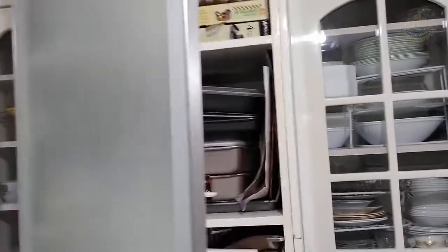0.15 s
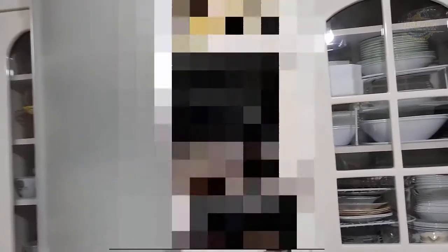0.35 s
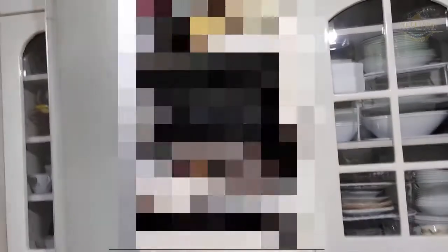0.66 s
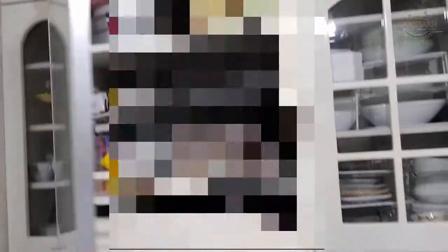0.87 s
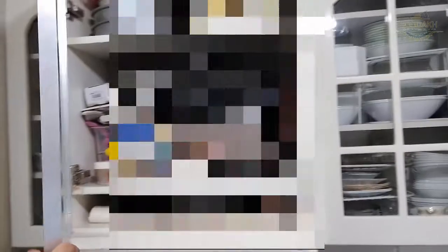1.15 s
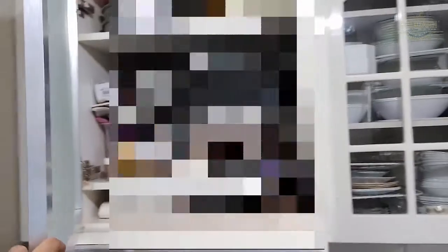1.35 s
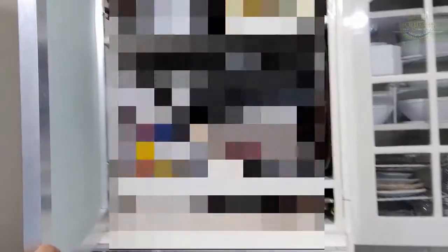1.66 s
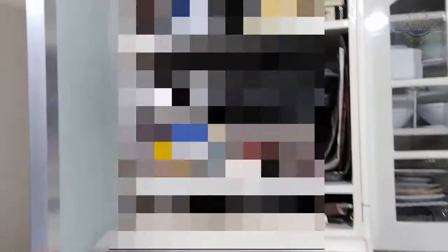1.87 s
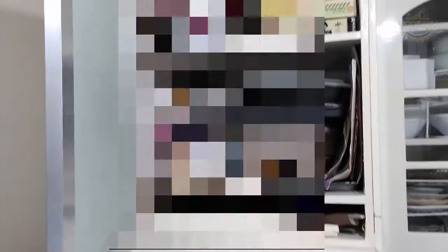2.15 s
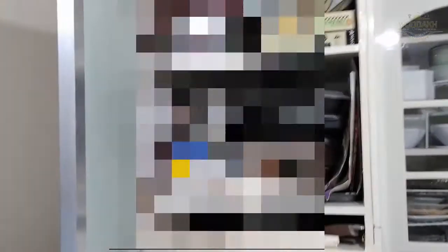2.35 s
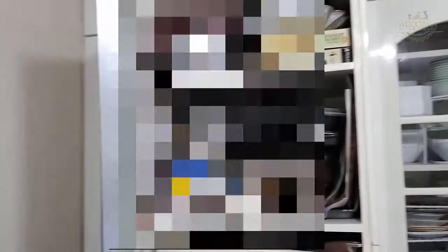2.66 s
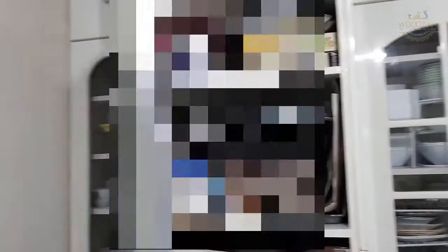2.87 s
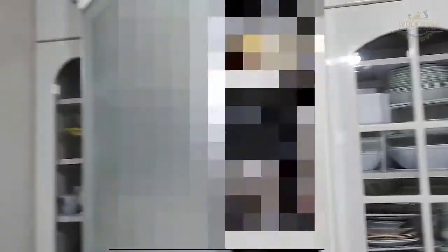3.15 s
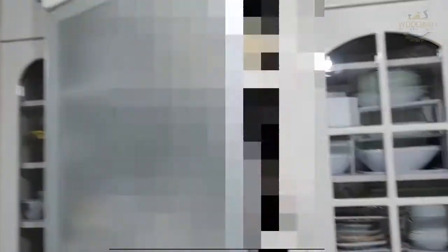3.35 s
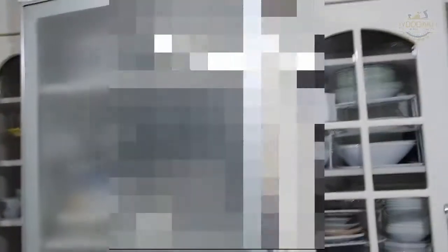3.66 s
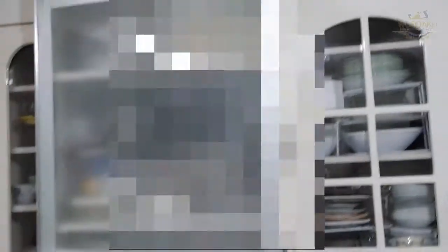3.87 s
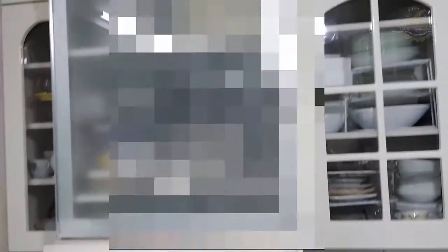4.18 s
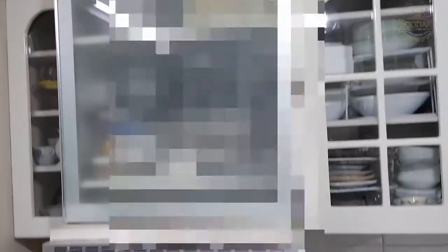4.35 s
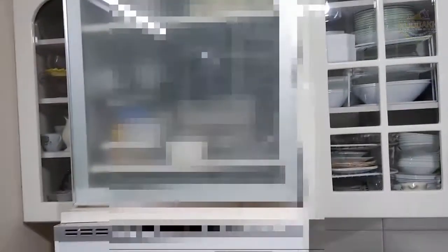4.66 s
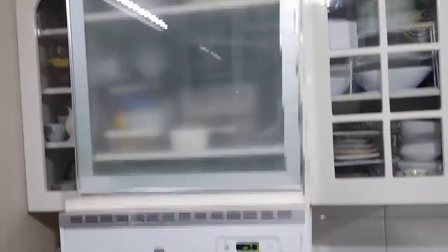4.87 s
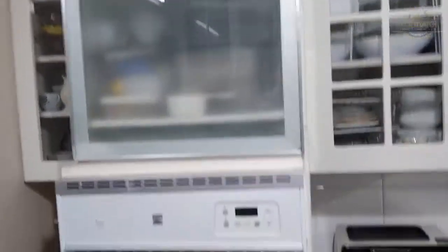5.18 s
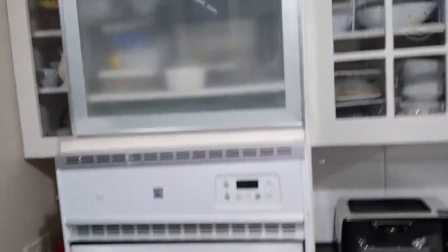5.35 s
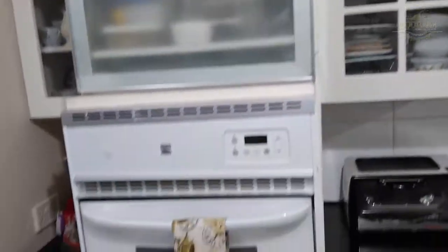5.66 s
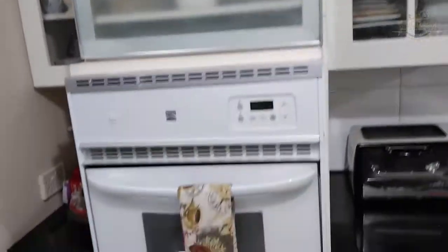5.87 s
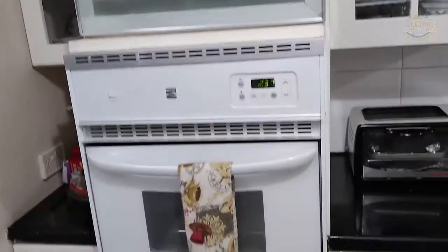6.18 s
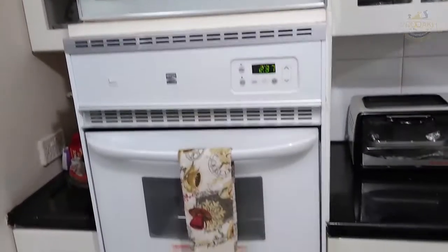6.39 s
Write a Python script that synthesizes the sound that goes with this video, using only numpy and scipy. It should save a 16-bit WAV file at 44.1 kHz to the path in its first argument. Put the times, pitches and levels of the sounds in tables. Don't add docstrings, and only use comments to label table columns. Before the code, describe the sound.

In a quiet kitchen a cabinet door drags with a hollow boom, its catch snaps twice, then slippers scuff and step on tiles over a fridge's hum.

```python
import sys
import numpy as np
from scipy import signal
from scipy.fft import rfft, irfft, next_fast_len
from scipy.io import wavfile
from scipy.ndimage import uniform_filter1d, map_coordinates

SR = 44100
rng = np.random.default_rng(int(sys.argv[2]) if len(sys.argv) > 2 else 0)


def magnitude_from_level(level_db):
    exponent = np.asarray(level_db, float) / 20
    return 10 ** exponent


def store_wav(level_fs):
    pcm = np.round(np.clip(np.atleast_2d(level_fs), -1, 1) * 32767)
    wavfile.write(sys.argv[1], SR, pcm.T.astype(np.int16))


N = 287576
SIZE = next_fast_len(N, True)
HZ = np.fft.rfftfreq(SIZE, 1 / SR) + 1e-3
TIME = np.arange(N) / SR
PORT_LAG_S = 0.000469
# [f/Hz, width/Hz, level/dB]
TILES = [(212, 88, -0.5), (323, 44, -0.5), (430, 65, -9), (633, 140, -0.5), (860, 190, -7), (1110, 79, -2)]


def on_hz(table):
    f, v = np.transpose(table)
    return np.interp(np.log(HZ), np.log(f), v)


def on_time(table):
    s, *columns = np.transpose(table)
    return [np.interp(TIME, s, c) for c in columns]


def colour(x, gain):
    return irfft(rfft(x, SIZE) * gain, SIZE)[..., :N]


def unit(x):
    return x / np.sqrt(np.mean(x ** 2))


def modes(table):
    out = 0
    for k, (f, w, db) in enumerate(table):
        out = out + (-1) ** k * magnitude_from_level(db) * 1j * HZ * w / (f * f - HZ ** 2 + 1j * HZ * w)
    return out


def peaks(table):
    return 1 + sum((magnitude_from_level(db) - 1) / (1 + (2 * (HZ - f) / w) ** 2) for f, w, db in table)


def band(lo_hz, hi_hz, order=3):
    sos = signal.butter(order, [lo_hz, hi_hz], "band", fs=SR, output="sos")
    return signal.sosfreqz(sos, HZ, fs=SR)[1]


def walk(rate_hz):
    k = int(SR / rate_hz)
    steps = np.repeat(rng.standard_normal(N // k + 1), k)
    return 1.295 * uniform_filter1d(uniform_filter1d(steps, k), k)[:N]


def diffuse(pair, most=0.96):
    like = np.clip(most, 0, 1) * np.sinc(2 * HZ * PORT_LAG_S)
    mid, side = rfft(pair, SIZE) * np.sqrt([(1 + like) / 2, (1 - like) / 2])
    return irfft([mid + side, mid - side], SIZE)[:, :N]


def fan_air():
    # [f/Hz, level/dB per Hz]
    air_tone = [(18, -48), (30, 4), (103, -27), (199, -9.5), (384, -6), (437, -3), (540, -15), (1190, -17),
                (2120, -16), (2540, -16.5), (3490, -21.5), (4300, -25.5), (9710, -40.5), (14400, -38.5),
                (16000, -30)]
    # [f/Hz, width/Hz, level/dB]
    air_peaks = [(140.5, 55.4, 13), (355.8, 30, 2), (493, 6.3, 9.5), (827, 3.7, 14.5), (2412, 250, 7.5),
                 (7050, 540, 6), (9640, 1100, 13)]
    shape = magnitude_from_level(on_hz(air_tone)) * peaks(air_peaks) * np.abs(band(90, 17000)) / (1 + (HZ / 15120) ** 300)
    shape /= np.sqrt(2 * np.mean(shape ** 2 * (HZ > 2300) * (HZ < 4000)))
    return colour(diffuse(rng.standard_normal((2, N))), shape)


def mains_buzz():
    mains_hz, tooth_width_hz = 50.007, 0.64
    # [f/Hz, level/dB over air]
    buzz_tone = [(30, -50), (50, -20.5), (150, -4.5), (600, -5), (1300, -4.5), (1900, -5), (2500, -4.5),
                 (3000, -9), (3500, -9.5), (4300, -15.5), (7000, -16), (10000, -20.5), (12000, -25.5),
                 (15000, -51)]
    # [mains multiple, extra level/dB]
    teeth = [(3, 9), (4, 11), (6, 5), (8, 4), (12, 4), (36, 6), (38, 9), (40, 5), (42, 8), (45, 5), (47, 6),
             (49, 7), (51, 7), (55, 7), (63, 6), (68, 9), (70, 10), (72, 9), (112, 7), (119, 7), (127, 9),
             (129, 8), (131, 6), (140, 8), (142, 8), (144, 6), (146, 6), (191, 7), (195, 8)]
    tooth = np.round(HZ / mains_hz).astype(int)
    tooth_db = 2.5 * rng.standard_normal(tooth[-1] + 1)
    for multiple, db in teeth:
        tooth_db[round(multiple)] = db
    comb = np.exp(-((HZ - tooth * mains_hz) / tooth_width_hz) ** 2) * magnitude_from_level(tooth_db[tooth])
    return colour(diffuse(rng.standard_normal((2, N))), comb * magnitude_from_level(on_hz(buzz_tone) + 28.5))


def compressor_drone():
    # [t/s, f/Hz, level/dB over background]
    drone_track = [(0, 440, -4.5), (1.0, 441.5, -1), (1.6, 438, -6), (2.8, 437, -12), (3.7, 435.5, -9),
                   (3.86, 435.5, 0), (4.7, 435.5, 3), (5.5, 434.5, 2.5), (6.0, 434, -.5), (6.52, 434.5, 0)]
    hz, db = on_time(drone_track)
    tone = np.sqrt(2) * np.sin(2 * np.pi * np.cumsum(hz) / SR)
    return magnitude_from_level(db) * tone * magnitude_from_level(.35 * walk(12))


def rumble():
    # [t/s, level/dB over background]
    rumble_track = [(0, -19), (.9, -13), (1.3, -0.5), (1.7, -13.5), (2.45, -16), (3.5, -17), (4.0, -26),
                    (5.0, -13), (5.6, -11), (6.52, -16)]
    low_modes = modes([(50.0, 2.6, 2.5), (75.4, 26, -4.0)]) ** 2
    deep = unit(colour(diffuse(rng.standard_normal((2, N)), most=0.9), low_modes))
    return magnitude_from_level(on_time(rumble_track)[0]) * deep


def humps():
    # [t/s, f/Hz, level/dB over background]
    hump_tracks = [
        [(0, 356, 2), (.2, 354, -3), (.5, 358, 1), (.9, 355, -3), (1.7, 352, -4), (2.6, 358, -6),
         (3.2, 358, -4), (3.5, 358, 0), (3.8, 354, 0), (4.0, 362, -6), (4.5, 364, -8), (4.7, 332, -4),
         (5.6, 330, -4), (6.52, 332, -7)],
        [(0, 800, -20), (2.2, 780, -20), (2.35, 780, -6), (2.6, 780, -20), (3.7, 790, -20), (3.9, 780, -8),
         (4.15, 768, -8), (4.3, 770, -20), (6.52, 775, -14)],
    ]
    hump_widths_hz = 14, 200
    out = 0
    for table, width_hz in zip(hump_tracks, hump_widths_hz):
        hz, db = on_time(table)
        a, b = unit(colour(rng.standard_normal((2, N)), 1 / (1 + (2 * HZ / width_hz) ** 2)))
        phase = 2 * np.pi * np.cumsum(hz) / SR
        out = out + magnitude_from_level(db) * (a * np.cos(phase) + b * np.sin(phase))
    return out


def sway(x, depth, swells, ratio):
    out = x
    for hz, swell in swells:
        out = out + depth * swell * colour(x, np.abs(band(hz, ratio * hz, order=2)))
    return out


def fridge():
    # [t/s, level/dB]
    gain_track = [(0, -54), (.6, -56), (1.65, -55), (1.9, -53.5), (2.2, -56.5), (2.45, -65.5), (2.8, -61.5),
                  (3.4, -55), (3.8, -53), (5.9, -54), (6.52, -53.5)]
    ratio = 2 ** .33
    swells = [(hz, walk(4)) for hz in 1000 * ratio ** np.arange(11)]
    air = sway(fan_air(), 0.057, swells, ratio)
    buzz = sway(mains_buzz(), 0.22, swells, ratio)
    return magnitude_from_level(on_time(gain_track)[0]) * (air + buzz + compressor_drone() + rumble() + humps())


def echo(x):
    # [f/Hz, T60/s]
    t60 = [(100, 1), (500, 0.25), (2000, 0.066), (6000, 0.076), (14000, 0.24)]
    # [f/Hz, level/dB]
    tail_tone = [(300, -0.5), (3000, -2.5), (6000, 5), (12000, -6)]
    tail_db = -7
    t = TIME[:SR]
    noise = diffuse(rng.standard_normal((2, N)))
    tail = 0
    for (lo, a), (hi, b) in zip(t60, t60[1:]):
        tail = tail + colour(noise, band(lo, hi, order=1))[:, :SR] * magnitude_from_level(-120 * t / (a + b))
    tail *= np.clip((t - .002) / .006, 0, 1)
    tail /= np.sqrt(np.sum(tail ** 2) / 2)
    shade = .4 + .55 / (1 + (HZ / 500) ** 2)
    direct = np.array([x, colour(np.roll(x, 9), shade)])
    return direct + magnitude_from_level(tail_db) * colour(x, magnitude_from_level(on_hz(tail_tone)) * rfft(tail, SIZE))


def knocks():
    # [t/s, peak/dB, body/dB over peak, click/dB over peak, rattle/ms]
    contacts = [(0.9848, -25, -16, -37, 1.7), (0.9885, -29, -6.5, -41, 3), (1.5794, -48.5, 14, -17, 3),
                (3.1775, -25.5, -35, -30, 1.6), (3.4385, -31, -15, -8, 2), (3.4418, -27, -9, -10, 2),
                (3.446, -30, -18, -10, 2.5), (3.4495, -32, -15, -12, 2), (3.4565, -32, -12, -8, 2),
                (3.461, -34, -12, -10, 2), (3.4685, -33, -12, -8, 3), (3.483, -36, -12, -12, 3),
                (3.511, -38, 2, -18, 2), (3.524, -37, -12, -16, 2), (4.11, -45, -19, -14, 10),
                (4.5492, -29, -10, -10, 2), (4.552, -27, -13, -14, 2.5), (4.557, -26.5, -12, -16, 2.5),
                (4.563, -31, -10, -14, 2.5), (4.572, -28.5, -10, -16, 3), (4.58, -43.5, 5.5, -20, 7.9),
                (4.593, -36, -6, -16, 3), (4.6105, -33, -8, -18, 2), (4.615, -38, 3, -20, 3),
                (4.699, -48, -8, -15, 3.6), (4.988, -40, -1.5, -21, 8.4), (5.3182, -31.5, -25, -14, 3),
                (5.3215, -34, -20, -16, 2), (5.3262, -30.5, -14, -14, 2.5), (5.3345, -35, -12, -18, 1.5),
                (5.3375, -36, -15, -18, 1.5), (5.349, -37, -15, -18, 2), (5.3548, -42, 6, -22, 2),
                (5.3665, -37, -12, -18, 2), (5.3745, -39, -2, -18, 2)]
    snaps = [
        (1.3035, -36, -14, 2, 1.7),
        (1.3115, -18, -25, -4, 2),
        (1.3191, -31, -10, -4, 1.9),
        (2.1921, -37, -19, 9, 1),
        (2.1937, -16, -19, 6, .6),
        (2.1946, -21, -19, 2, 1),
        (2.1958, -27, -19, 0, 1.5),
        (2.202, -40, -23, -3, 1.8),
        (2.3099, -30, -14, -19, 3.8),
    ]
    # [t/s, level/dB]
    thuds = [
        (3.4391, -56),
        (4.171, -56),
        (4.55, -43.5),
        (4.583, -42),
        (4.609, -44.5),
        (4.988, -50),
        (5.3198, -62),
        (5.3592, -54),
    ]
    # [f/Hz, width/Hz, level/dB]
    sole = [(980, 380, -8.5), (1440, 450, -2.5), (2030, 455, 3), (2580, 330, 4), (3120, 380, -3),
            (4010, 340, -6.5), (6180, 950, -13.5)]
    click = [(5340, 1300, -9), (7900, 1700, 0), (10200, 760, 5), (11800, 450, 8), (13500, 1600, 1)]
    catch = [(1760, 390, 2.5), (2580, 350, 0), (3050, 470, -7), (5360, 840, -15), (7850, 790, -15)]
    hard_hz, soften, push_s = 22000, .6, 0.0048
    drive, t = np.zeros((5, N)), TIME[:4096]
    chance = rng.standard_normal((len(snaps + contacts), 4096))
    for k, ((s, peak_db, body_db, click_db, ms), rattle) in enumerate(zip(contacts + snaps, chance)):
        burst = rattle * (np.exp(-t / (max(ms, .3) / 1000)) + 1.5 * np.exp(-t / .0003))
        burst[0] = 4
        burst *= np.sqrt(ms / np.sum(burst ** 2))
        keep = np.exp(-2 * np.pi * hard_hz * magnitude_from_level(soften * click_db) / SR)
        soft = signal.lfilter([(1 - keep) ** 2], [1, -2 * keep, keep ** 2], burst)
        parts = [soft * magnitude_from_level(25), burst * magnitude_from_level(body_db + 31.5), burst * magnitude_from_level(click_db + 6.0)]
        struck = 0 if k < len(contacts) else 4
        start = int(s * SR)
        drive[[struck, 1, 2], start:start + 4096] += magnitude_from_level(peak_db) * np.array(parts)
    push = np.exp(-t / push_s) / (push_s * SR)
    for s, db in thuds:
        start = int(s * SR)
        drive[3, start:start + 4096] += magnitude_from_level(db + 61.0) * push
    bodies = [modes(sole) * band(600, 7500),
              modes(TILES) * band(120, 2000),
              modes(click) * band(4000, 14500, order=2),
              modes([(48, 20, 0), (72, 25, -1)]) * band(38, 300, order=2),
              modes(catch) * band(700, 9000)]
    return echo(colour(drive, np.array(bodies)).sum(axis=0))


def boom():
    # [t/s, f/Hz, level/dB]
    boom_tracks = [
        [(1.06, 141.2, -65), (1.132, 152.8, -42), (1.2, 151.2, -42.5), (1.244, 161, -36), (1.26, 160.4, -44),
         (1.308, 150.1, -41), (1.56, 147, -59), (1.58, 146.6, -44.5), (1.7, 148.3, -65)],
        [(1.97, 149.2, -60), (2.002, 149.5, -50), (2.036, 158.7, -42.5), (2.17, 160.5, -37.5),
         (2.218, 173, -65), (2.26, 171.2, -59)],
    ]
    out = 0
    for table in boom_tracks:
        hz, db = on_time(table)
        live = np.clip(np.minimum(TIME - table[0][0], table[-1][0] - TIME) / .02, 0, 1)
        phase = 2 * np.pi * np.cumsum(hz * (1 + 0.0304 * walk(30.15))) / SR
        out = out + live * magnitude_from_level(db + 1.3 * walk(40)) * np.sin(phase)
    return magnitude_from_level(2.5) * out


def rub(full_s, stop_s, level_db, rise_db_s, dying_s):
    sag_db_s, dying_db, fade_db_s = 19, 18.5, 23.5
    after = np.maximum(TIME - stop_s, 0)
    hold = np.clip(TIME - full_s, 0, max(stop_s - full_s, 0))
    fall_db = rise_db_s * np.maximum(full_s - TIME, 0) + sag_db_s * hold
    fall_db = fall_db + dying_db * (1 - np.exp(-after / dying_s)) + fade_db_s * after
    return magnitude_from_level(level_db - fall_db)


def drags():
    # [full t/s, stop t/s, level/dB, rise/(dB/s), dying/s]
    door_drags = [
        [(1.118, 1.286, -31.5, 260, 0.49), (1.138, 1.342, -38, 228, 0.18), (1.13, 1.38, -51.5, 143, .07)],
        [(2.015, 2.185, -35, 260, 0.036), (2.008, 2.19, -37, 326, 0.063), (2.005, 2.205, -49.5, 300, 0.17)],
    ]
    first_touch = (1.04, 1.12, -57, 280, .03)
    # [f/Hz, width/Hz, level/dB]
    panel_modes = [
        [(152.5, 42, -5), (273, 18, -5.5), (329, 27, -7), (440, 55, -3), (541, 48, -4.5), (634, 24, -1.5),
         (761, 61, -7), (860, 134, -11.5), (1000, 12, -8), (1140, 170, -15)],
        [(161.8, 25, -5.5), (257.7, 16.4, 1), (440, 72, -6.5), (640, 150, -10.5), (734, 22, -5.5),
         (882, 24, -8), (1060, 60, -25)],
    ]
    edge_rings = [
        [(2300, 300, 4.5), (3200, 760, -1)],
        [(2280, 310, 8), (3700, 460, 2)],
    ]
    # [t/s, level/dB]
    effort = [(1.1, 0), (1.12, -3), (1.14, -4), (1.165, 0), (1.21, 2), (1.235, 1.5), (1.3, 2.5), (1.45, 1),
              (1.9, 0)]
    # [t/s, length/s, body/dB, edge/dB over body, hiss/dB over body]
    scuffs = [
        (0.988, 0.035, -57, 7.5, -29),
        (3.444, 0.031, -52.5, 11.5, 3),
        (4.553, 0.031, -45, 0, -17),
        (4.638, 0.028, -69, 7, -15),
        (4.988, 0.045, -53, -0.5, -15),
        (5.319, 0.032, -50, 1, -14),
    ]
    scuff_rise_db_s, scuff_dying_s, slips_per_s = 4000, 0.1, 1500
    slips = rng.standard_normal((2, N)) * (rng.random((2, N)) < slips_per_s / SR)
    slips = diffuse(slips * magnitude_from_level(2.36 * rng.exponential(size=N)), most=0.96)
    grit = rng.standard_normal((2, N)) * magnitude_from_level(1.6 * rng.exponential(size=(2, N)) + .7 * walk(60))
    edge = unit(colour(diffuse(grit), band(670, 6200, order=2) * (1500 / HZ) ** 0.65))
    hiss = unit(colour(grit, (band(4200, 9200, order=2) + .22) * band(3000, 16000)))
    solids = [unit(colour(slips, modes(solid) * band(147, 2200))) for solid in panel_modes + [TILES]]
    *panels, tiles = solids
    out = rub(*first_touch) * hiss
    for rows, panel, rings in zip(door_drags, panels, edge_rings):
        layers = panel, colour(edge, peaks(rings)), hiss
        out = out + sum(rub(*row) * layer for row, layer in zip(rows, layers))
    out = out * magnitude_from_level(on_time(effort)[0])
    for s, length_s, body_db, edge_db, hiss_db in scuffs:
        gain = rub(s, s + length_s, body_db, scuff_rise_db_s, scuff_dying_s)
        out = out + gain * (tiles + magnitude_from_level(edge_db) * edge + magnitude_from_level(hiss_db) * hiss)
    return out


def scene():
    return fridge() + knocks() + boom() + drags()


def low_pass(x):
    return signal.sosfilt(signal.butter(12, 16500, fs=SR, output="sos"), x)


def record(dry):
    # [f/Hz, level/dB]
    port_front = [(100, -.6), (1150, -.3), (1500, 1.5), (5000, 2.2), (9000, 3.5), (15000, 2)]
    # [f/Hz, share/1]
    port_feed = [(100, 0.83), (2100, 1), (4400, 0.85), (6400, 0.35), (7400, 0.4), (10000, 0.039),
                 (15000, 0.084)]
    # [f/Hz, phase/rad]
    port_lead = [(2500, 0), (4300, .27), (6000, 0)]
    # [f/Hz, level/dB]
    tilt = [(60, 0), (200, -3), (700, -0.9), (1300, 0.8), (4400, 2), (8000, 4.5), (15000, 1.5)]
    # [f/Hz, width/Hz, mean depth/1, spread/1, changes/(1/s)]
    case_dip = (4350, 440, .45, .35, 5)
    lag_drift, lag_drift_hz = .012, 8
    front_db, tilt_db = on_hz(port_front), on_hz(tilt)
    ports = colour(dry, magnitude_from_level(np.array([front_db, -front_db]) / 2))
    feed, turn = np.clip(on_hz(port_feed), 0, .97), 2 * np.pi * HZ * PORT_LAG_S
    read = (TIME - PORT_LAG_S * (1 + lag_drift * walk(lag_drift_hz))) * SR
    fed = colour(ports, feed * np.exp(1j * on_hz(port_lead)))
    late = [map_coordinates(port, [read], mode="wrap") for port in fed[::-1]]
    loss = np.sqrt(1 + feed ** 2 - 2 * feed * np.sinc(turn / np.pi) * np.cos(turn))
    top = 1 / (1 + (HZ / 15700) ** 200)
    sides = colour(ports - late, top / loss * magnitude_from_level(np.array([tilt_db, -tilt_db]) / 2))
    dip_hz, width_hz, depth, spread, rate_hz = case_dip
    notch = colour(sides, 1 / (1 + (2 * (HZ - dip_hz) / width_hz) ** 6))
    sides = sides - np.clip(depth + spread * walk(rate_hz), 0, .9) * notch
    return low_pass(sides)


dry = scene()
out = record(dry)
store_wav(out)
```